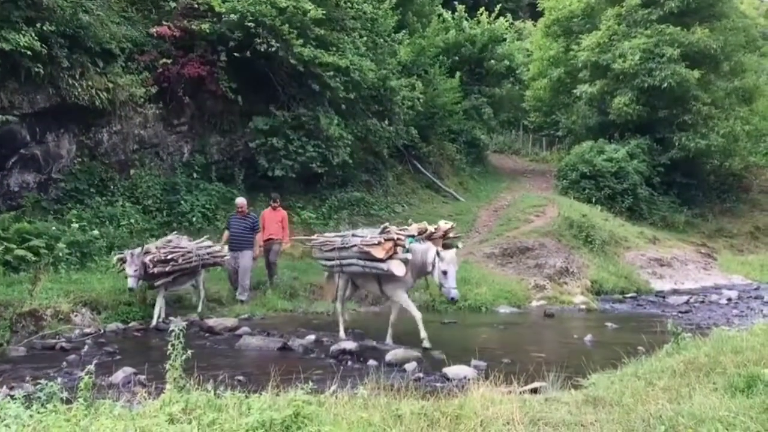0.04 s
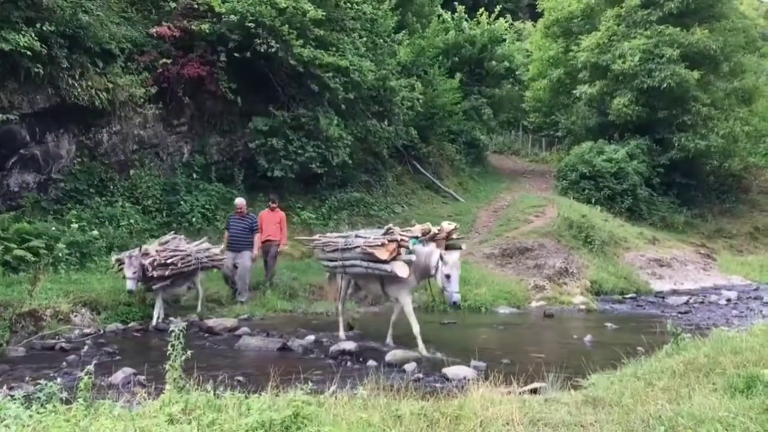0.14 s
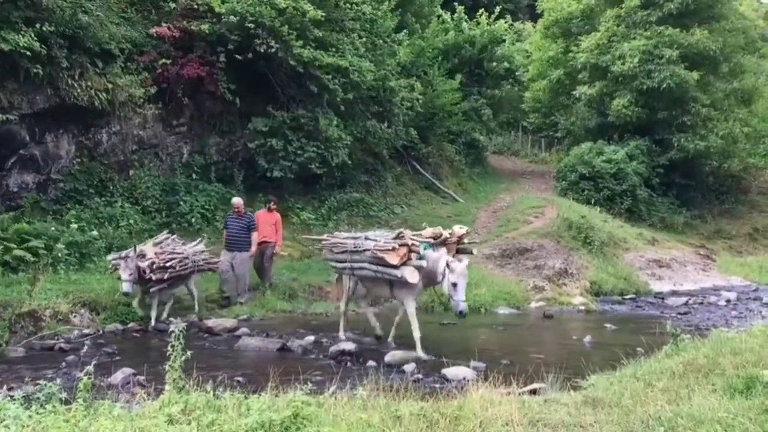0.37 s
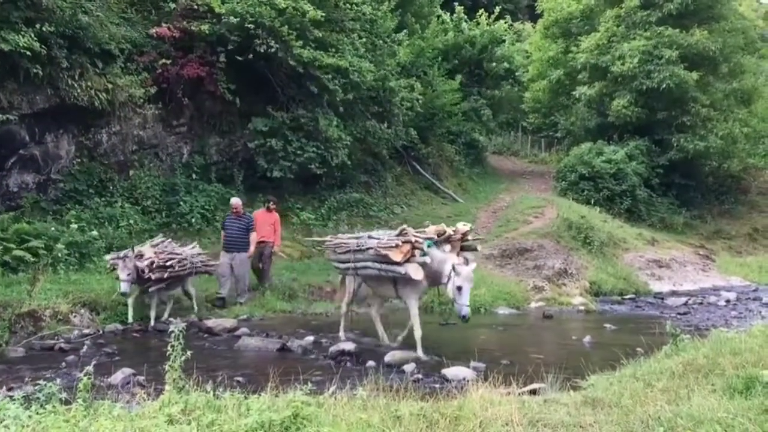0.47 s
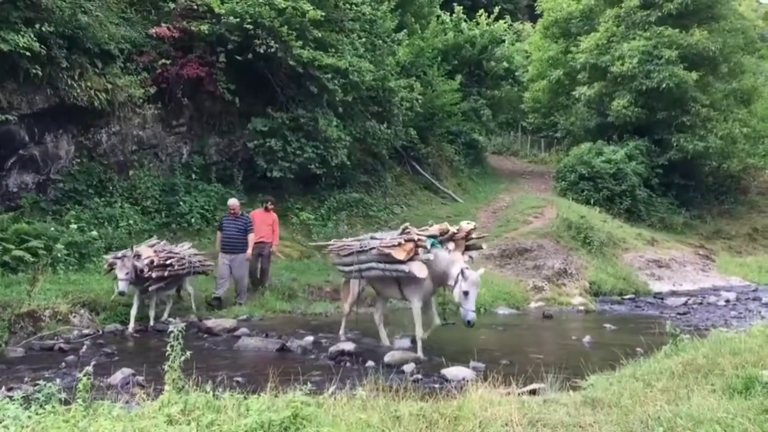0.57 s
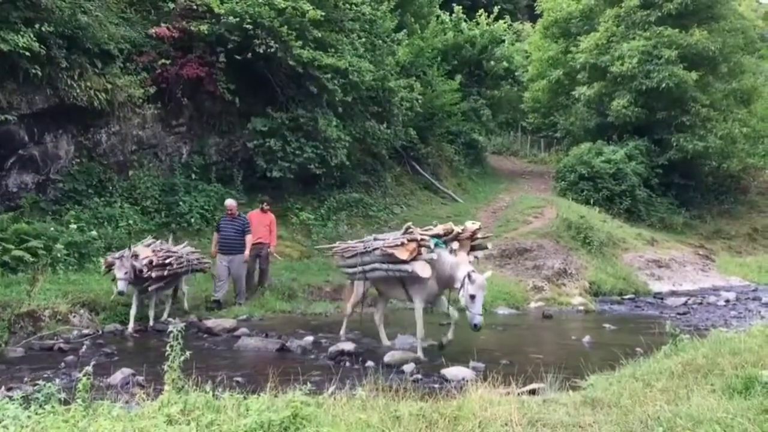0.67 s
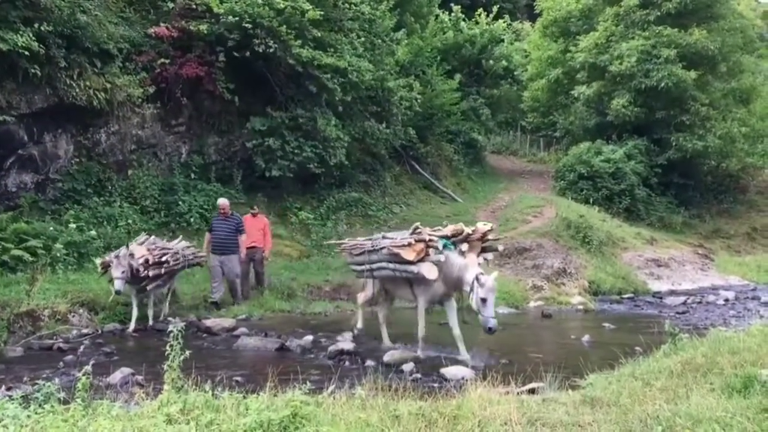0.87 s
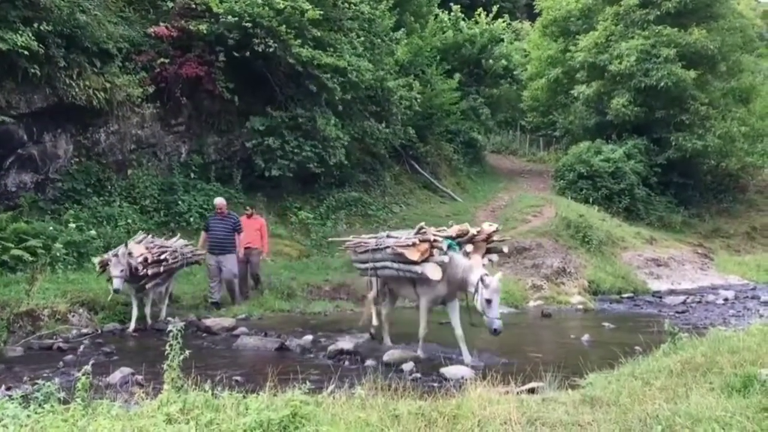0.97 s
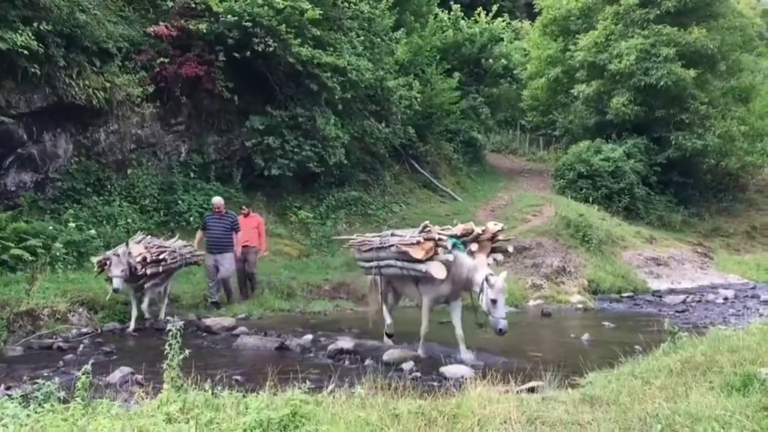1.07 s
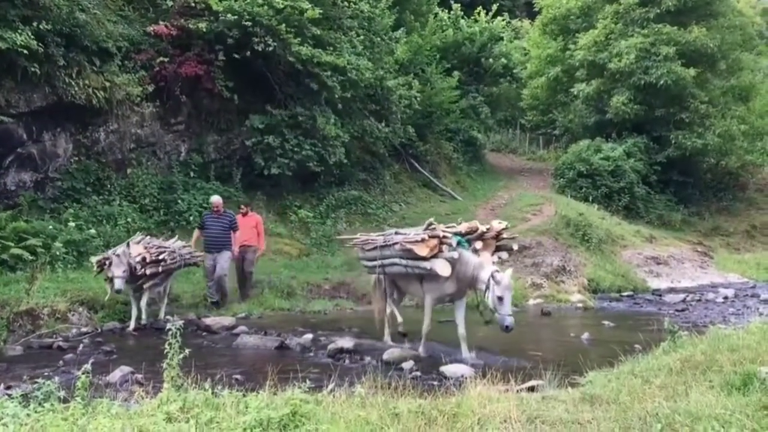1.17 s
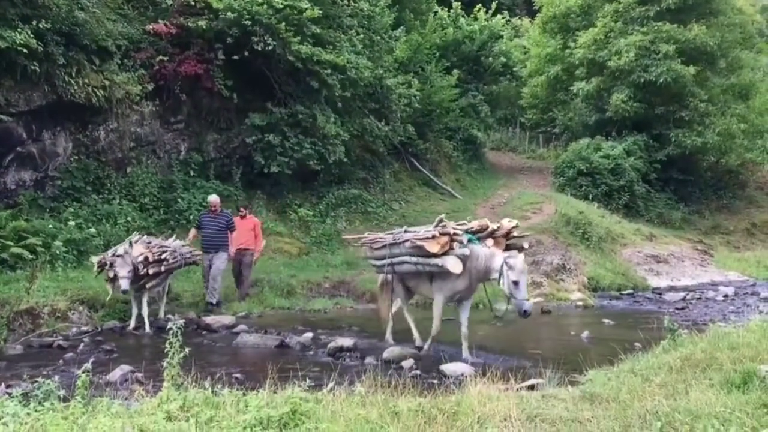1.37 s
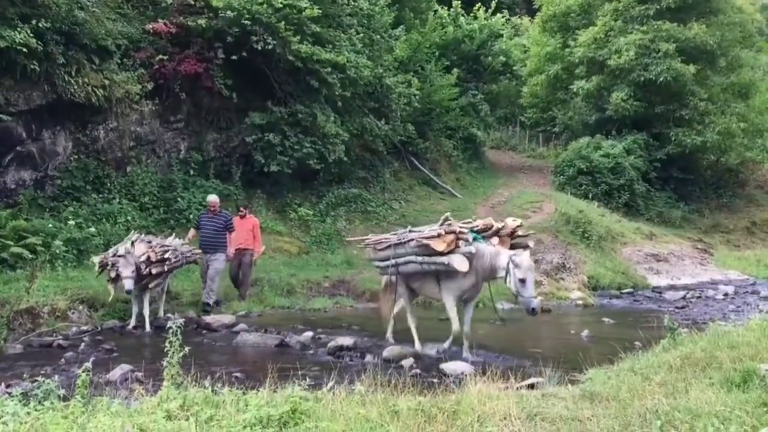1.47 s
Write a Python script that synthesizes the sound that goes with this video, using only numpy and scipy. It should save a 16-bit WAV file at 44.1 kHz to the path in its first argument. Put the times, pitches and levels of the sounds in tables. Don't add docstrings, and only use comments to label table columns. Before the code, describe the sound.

A donkey brays once outdoors: a high whistling squeal on the in-breath, then a rough roar settling into a falling note and hoarse sigh, over a plopping shallow stream; small microphone buzzes on the loud parts.

```python
import sys
import numpy as np
from scipy import signal
from scipy.fft import rfft, irfft
from scipy.io import wavfile
from scipy.ndimage import uniform_filter1d

SR = 44100
rng = np.random.default_rng(int(sys.argv[2]) if len(sys.argv) > 2 else 0)


def magnitude_from_level(level_db):
    exponent = np.asarray(level_db, float) / 20
    return 10 ** exponent


def output_pcm(signal):
    pcm = np.clip(np.atleast_2d(signal).T, -1, 1) * 32767
    wavfile.write(sys.argv[1], SR, np.round(pcm).astype(np.int16))


N = 66150


def evened(x):
    return x / np.sqrt(np.mean(x ** 2) + 1e-20)


def steadied(x, share, size=200):
    return x * (uniform_filter1d(evened(x) ** 2, size=size) + 0.059) ** (-share / 2)


def read(points, hz):
    f, value = np.transpose(points)
    return np.interp(np.log(hz + 1), np.log(f + 1), value)


def curve(rows, size=1):
    rows = np.array(rows)
    return np.interp(np.arange(N) / SR, rows[:, 0], rows[:, size])


def level(rows, size=1):
    t = np.arange(N) / SR
    edge = np.clip(np.minimum(t - rows[0][0], rows[-1][0] - t) * 200, 0, 1)
    return magnitude_from_level(curve(rows, size=size)) * edge


def wander(top_hz):
    lowpass = np.exp(-(np.fft.rfftfreq(N, 1 / SR) / top_hz) ** 2)
    return evened(irfft(rfft(rng.standard_normal(N)) * lowpass, N))


def coloured(x, points):
    return irfft(rfft(x) * magnitude_from_level(read(points, np.fft.rfftfreq(N, 1 / SR))), N)


def resonate(x, hz, width):
    turn = np.exp(2j * np.pi * np.cumsum(hz * np.ones(N)) / SR)
    r = np.exp(-np.pi * abs(width) / SR)
    return 2 * (turn * signal.lfilter([(1 - r) ** 2], [1, -2 * r, r * r], x / turn)).real


def throat(drive, shape):
    return [magnitude_from_level(db) * resonate(drive, hz, width) / np.sqrt(abs(width)) for hz, width, db in shape]


# time_s, pitch_hz, level_db
WHISTLE = [
    [(.345, 2440, -54), (.353, 2440, -35), (.365, 2436, -34.5), (.375, 2420, -27.5), (.405, 2419, -23),
     (.436, 2395, -28.5), (.455, 2385, -26), (.478, 2372, -36), (.52, 2350, -42)],
    [(.545, 2345, -39), (.562, 2320, -34), (.584, 2283, -21.5), (.636, 2281, -20.5), (.652, 2298, -24),
     (.668, 2283, -20), (.679, 2275, -26), (.692, 2290, -46), (.735, 2287, -56)],
]
# time_s, level_db, top_resonance_db, middle_resonance_db
RUSH = [(.36, -50, 12, -1), (.385, -51.5, 16, 1), (.418, -45, 10, 0), (.428, -36.5, 2, -12),
        (.47, -35.5, 4.5, -2), (.56, -31, 5.5, 0), (.586, -26.5, -16, -3), (.605, -37.5, 0, 1),
        (.72, -52, -14, 3.5)]
# centre_hz, width_hz, level_db
THROAT_IN = [(920, 600, -13.5), (1310, 122, 3), (1770, 420, 6), (2420, 190, -3), (3390, 260, -9)]


def hee():
    wobble_hz, wobble_db, faint_wobble_db, octave_db = 12.8, 1.06, 1.5, -8.5
    rows = WHISTLE[0] + WHISTLE[1]
    phase = 2 * np.pi * np.cumsum(curve(rows) + wobble_hz * wander(top_hz=119)) / SR
    between = abs(np.arange(N) / SR - .52) < .07
    faint = np.clip(-(curve(rows, size=2) + 30) / 8, 0, 1) * between
    gain = level(rows, size=2) * magnitude_from_level((wobble_db + faint_wobble_db * faint) * wander(top_hz=91))
    whistle = np.sqrt(2) * gain * (np.sin(phase) + magnitude_from_level(octave_db) * gain * np.sin(2 * phase))
    parts = throat(rng.standard_normal(N) * magnitude_from_level(1.2 * wander(top_hz=150)), THROAT_IN)
    parts[2] = parts[2] * magnitude_from_level(curve(RUSH, size=3))
    parts[-1] = parts[-1] * magnitude_from_level(curve(RUSH, size=2))
    return whistle + evened(sum(parts)) * level(RUSH)


# time_s, level_db, second_resonance_db
ROAR = [(.73, -53, 14), (.748, -26, 5), (.764, -18.5, 3), (.79, -22, -0.5), (.87, -19.5, -4),
        (.96, -23.5, -3.5), (1.05, -19, -5.5), (1.075, -16.5, -16), (1.1, -53, -17)]
# centre_hz, width_hz, level_db
THROAT_OUT = [(398, 56, -17), (900, 124, -11), (1325, 190, 0), (1676, 170, -8.5), (2130, 340, -19),
              (3400, 380, -27.5)]
# time_s, first_hz, second_hz, fourth_db
LOWER_DRIFT = [(.74, 420, 900, -8), (.77, 410, 945, -6), (.81, 378, 935, 0), (.845, 385, 920, 1),
               (.88, 435, 905, 2), (.925, 440, 930, 2), (.96, 420, 950, -8), (1.02, 415, 865, 0),
               (1.09, 410, 880, 0)]
# time_s, third_hz, fourth_hz, first_db
UPPER_DRIFT = [(.74, 1220, 1700, -15), (.78, 1305, 1715, 1.5), (.82, 1310, 1776, 2), (.88, 1336, 1690, 2),
               (.93, 1315, 1670, 4.5), (1.0, 1350, 1705, -1), (1.09, 1360, 1624, -6)]
# time_s, strength_db
FLAPS = [(0.758, -9.5), (0.768, -5.5), (0.775, -2), (0.788, -1), (.797, 2.5), (0.808, -1), (0.823, -4.5),
         (0.839, -3.5), (0.853, -6), (0.864, -5), (.877, -7), (.898, -5), (0.907, -4), (0.917, -7.5),
         (.923, -2), (0.933, 4), (0.949, -0.5), (.955, -0.5), (0.969, -5.5), (.983, -3.5), (0.995, 1.5),
         (1.01, -10), (1.021, -1.5), (1.03, -13.5), (1.041, -2.5), (1.049, -14), (1.059, -9.5),
         (1.068, -13)]


def roar():
    folds_hz, jitter, noise_share = 442.4, .06, .72
    flap_s, between_db, steady, low_steady = .0038, -11, .7, .7
    turns = np.cumsum(folds_hz * (1 + jitter * wander(top_hz=159.0))) / SR
    folds = sum(np.cos(2 * np.pi * k * turns) for k in range(1, 10))
    puffs = (0.47 + np.exp(-(turns % 1) / 0.19)) * rng.standard_normal(N)
    drive = (1 - noise_share) * evened(folds) + noise_share * evened(puffs)
    low = [(curve(LOWER_DRIFT, size=k + 1), width, db)
           for k, (_, width, db) in enumerate(THROAT_OUT[:2])]
    high = [(curve(UPPER_DRIFT, size=k + 1), width, db)
            for k, (_, width, db) in enumerate(THROAT_OUT[2:4])]
    parts = throat(evened(puffs), low) + throat(drive, high + THROAT_OUT[4:])
    t = np.arange(N) / SR
    chop = magnitude_from_level(between_db) + sum(magnitude_from_level(db) * np.exp(-((t - s) / flap_s) ** 2) for s, db in FLAPS)
    parts[0] = steadied(parts[0], low_steady, size=500) * magnitude_from_level(curve(UPPER_DRIFT, size=3))
    parts[1] = steadied(parts[1], low_steady, size=300) * magnitude_from_level(curve(ROAR, size=2))
    parts[2] = steadied(parts[2], steady) * chop
    parts[3] = parts[3] * magnitude_from_level(curve(LOWER_DRIFT, size=3)) * np.sqrt(chop)
    parts[4] = parts[4] * np.sqrt(chop)
    parts[5] = parts[5] * np.sqrt(chop)
    return evened(coloured(sum(parts), [(180, -27), (330, -16)])) * level(ROAR)


# time_s, pitch_hz, level_db, mouth (0 open, 1 nearly shut, 2 reopened)
NOTE = [(1.055, 305, -31, 0), (1.076, 303, -22.5, 0), (1.11, 296.5, -20.5, .1), (1.124, 292.5, -23, .25),
        (1.14, 288, -19, .35), (1.16, 284, -26, .7), (1.188, 279.5, -28, 1), (1.203, 277, -34, 1),
        (1.222, 274, -29, 2), (1.248, 270, -46, 2)][:]
# multiple, level_db
OPEN = [(1, -21), (2, -25), (3, -2), (4, -7), (5, 7.5), (6, -6), (7, -17), (8, -9), (9, -48)]
# multiple, level_db
SHUT = [(1, -17), (2, 2.5), (3, -8), (4, 2.5), (5, -5), (6, -5), (7, -14), (8, -40), (9, -40)]
# multiple, level_db
REOPENED = [(1, -6), (2, -2), (3, -14), (4, -5), (5, 6.5), (6, 0), (7, -22), (8, -43), (9, -34)]
# time_s, level_db
SIGH = [(1.06, -50), (1.09, -42), (1.15, -41), (1.2, -43), (1.222, -36), (1.25, -38), (1.28, -46),
        (1.31, -66)]
# centre_hz, width_hz, level_db
THROAT_END = [(370, 110, -3), (600, 160, -3), (1000, 200, -14), (1340, 220, 0), (1680, 220, -5),
              (3200, 350, -11)]


def note():
    jitter, shimmer_db, rise_s = .009, 1.4, 0.0056
    turns = np.cumsum(curve(NOTE) * (1 + jitter * wander(top_hz=143))) / SR
    mouth = np.clip(curve(NOTE, size=3), 0, 2)
    gains = [magnitude_from_level(np.interp(mouth, range(3), [a, b, c]) + shimmer_db * wander(top_hz=41.6))
             for (_, a), (_, b), (_, c) in zip(OPEN, SHUT, REOPENED)]
    stack = sum(g * np.cos(2 * np.pi * (k + 1) * turns - 0.305 * k * k)
                for k, g in enumerate(gains))
    stack = stack / np.sqrt(uniform_filter1d(sum(g ** 2 for g in gains), size=1500) / 2)
    rise = np.clip((np.arange(N) / SR - NOTE[0][0]) / rise_s, 0, 1)
    puffs = (0.75 + np.exp(-(turns % 1) / 0.73)) * rng.standard_normal(N)
    breath = evened(coloured(sum(throat(puffs, THROAT_END)), [(150, -30), (300, -17)]))
    return stack * rise * level(NOTE, size=2) + breath * level(SIGH)


def banks(x):
    echo_db, t60_s, density, first_s = -19, .15, .05, .008
    t = np.arange(SR // 2) / SR
    signs = rng.choice([-1., 1.], len(t)) * (rng.random(len(t)) < density)
    taps = signs * magnitude_from_level(-60 * t / t60_s) * (t > first_s)
    return magnitude_from_level(echo_db) * signal.fftconvolve(x, taps / np.linalg.norm(taps))[:N]


def bubble(hz, t60_s):
    t = np.arange(3000) / SR
    ring = np.sin(2 * np.pi * hz * t * (1 + 0.52 * t))
    return ring * magnitude_from_level(-60 * t / t60_s) * np.minimum(t / 0.00058, 1)


# start_s, peak_db, pitch_hz, t60_s
PLOPS = [
    (.138, -36, 646, 0.037),
    (0.141, -39, 1246, 0.066),
    (.151, -36.5, 3720, 0.01),
    (.209, -29.5, 770, 0.014),
    (0.361, -46.5, 214, 0.4),
    (.375, -47, 295, 0.17),
    (.535, -36, 810, 0.034),
    (.575, -32, 625, 0.031),
    (1.321, -27, 900, 0.0054),
    (1.318, -44, 160, .04),
]


def plops():
    out = np.zeros(N)
    for s, db, hz, t60_s in PLOPS:
        at = round(s * SR)
        out[at:at + 3000] += (magnitude_from_level(db) * bubble(hz, t60_s))[:N - at]
    return out


# centre_s, peak_db, pitch_hz, half_length_s
GURGLES = [
    (1.41, -47, 1105, 0.0055),
    (1.427, -38, 1800, 0.0075),
    (1.427, -42, 2234, .008),
    (1.441, -41.5, 2240, 0.0056),
    (1.442, -44, 1870, 0.011),
    (1.474, -49, 1230, .006),
    (1.451, -38.5, 3200, .0015),
]


def gurgles():
    t = np.arange(N) / SR
    return sum(magnitude_from_level(db) * np.sin(2 * np.pi * hz * (t - s)) * np.exp(-((t - s) / half_s) ** 2)
               for s, db, hz, half_s in GURGLES)


def thud():
    start_s, peak_db, pitch_hz, half_s = 1.45, -34.5, 60.3, 0.0095
    u = np.arange(N) / SR - start_s
    return magnitude_from_level(peak_db) * np.cos(2 * np.pi * pitch_hz * u) * np.exp(-(u / half_s) ** 2)


# start_s, peak_db
SPRAY = [(0.0942, -37), (0.1074, -39), (1.296, -41), (1.3204, -49), (1.3764, -43), (1.3924, -43),
         (1.4104, -45), (1.4244, -44), (1.4386, -37.5), (1.4507, -37), (1.4634, -43), (1.4795, -42),
         (1.4954, -47)]


def spray():
    half_s, gain_db, bright_hz = .003, -15, 7000
    t = np.arange(N) / SR
    gate = sum(magnitude_from_level(db + gain_db) * np.exp(-((t - s - half_s) / half_s) ** 2) for s, db in SPRAY)
    return gate * evened(coloured(rng.standard_normal(N), [(1500, -25), (bright_hz, 0)]))


# freq_hz, level_db_per_hz
STREAM = [(25, 2.5), (60, 0.5), (150, -9), (230, -2), (1300, -4.5), (3720, -14), (9000, -27), (15500, -34)]


def stream():
    wash_db, babble_db, bubbles_per_s = -48, -52.5, 500
    surge_s, surge_rise_s, surge_db = 1.438, 0.024, 5
    wash = evened(coloured(rng.standard_normal(N) * magnitude_from_level(1.6 * wander(top_hz=24)), STREAM))
    size = magnitude_from_level(3.3 * np.minimum(rng.exponential(1, N), 3)) * (rng.random(N) < bubbles_per_s / SR)
    kind, pitches_hz = rng.integers(0, 24, N), np.geomspace(300, 6000, 24)
    babble = 0
    for k, hz in enumerate(pitches_hz):
        ring = bubble(hz, 16 / hz) * magnitude_from_level(read(STREAM, hz)) * hz
        babble = babble + signal.oaconvolve(size * (kind == k), ring)[:N]
    t = np.arange(N) / SR
    surge = magnitude_from_level(surge_db / (1 + np.exp(-(t - surge_s) / surge_rise_s)))
    return magnitude_from_level(wash_db) * wash * surge + magnitude_from_level(babble_db) * evened(babble)


def scene():
    donkey = hee() + roar() + note()
    water = plops() + gurgles() + thud() + spray() + stream()
    return (donkey + banks(donkey) + water)[None]


# freq_hz, level_db
BUZZ = [(3000, -11), (4600, -5.5), (5900, 5.5), (7000, -0.5), (9200, -2), (11300, 12.5), (13500, 9.5),
        (15500, 3)]


def overload(x):
    knee, soft_knee, slew_tilt, offset = 0.045, .004, 0.89, .002
    fast = coloured(x, [(230, -20 * slew_tilt), (2300, 0), (3000, 6.0), (6000, -14)]) + offset
    excess = soft_knee * np.logaddexp(0, (abs(fast) - knee) / soft_knee)
    over = np.sign(fast) * excess * np.tanh((fast / knee) ** 2)
    return coloured(over, [(1500, -70)] + BUZZ)


def diaphragm_push():
    start_s, peak_db, rise_s, leak_s = .198, -23.7, .065, .5
    u = np.maximum(np.arange(N) / SR - start_s, 0)
    return -magnitude_from_level(peak_db) * (np.exp(-u / leak_s) - (1 + u / rise_s) * np.exp(-2 * u / rise_s))


def roll_off(x):
    return signal.sosfilt(signal.butter(12, 15600, fs=SR, output="sos"), x)


def record(dry):
    x = dry[0]
    mix = (x + overload(x) + diaphragm_push())[None]
    return roll_off(mix)


dry = scene()
out = record(dry)
output_pcm(out)
```